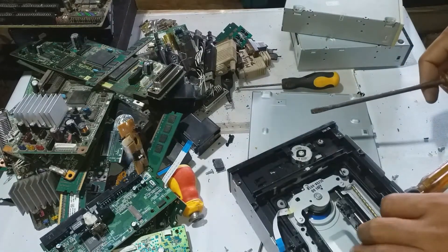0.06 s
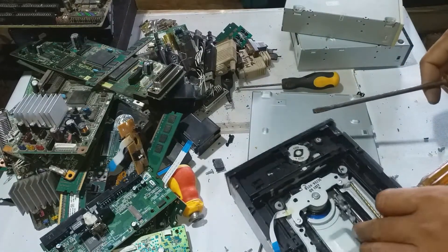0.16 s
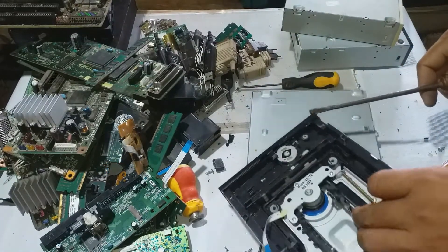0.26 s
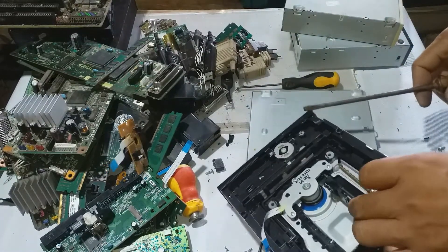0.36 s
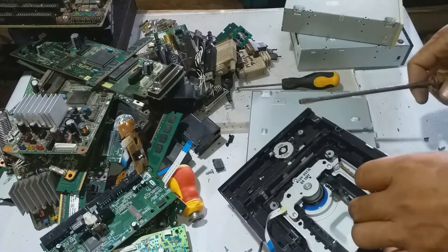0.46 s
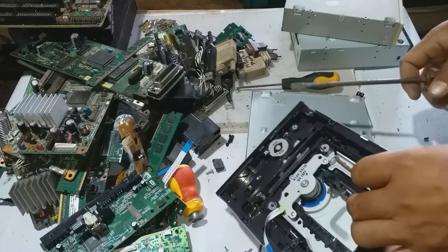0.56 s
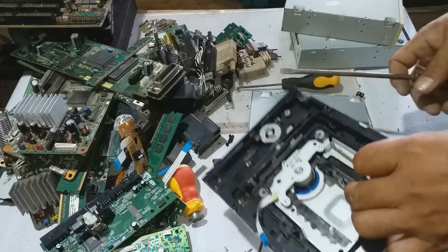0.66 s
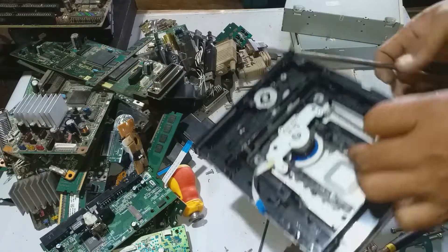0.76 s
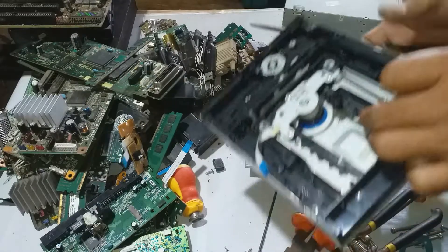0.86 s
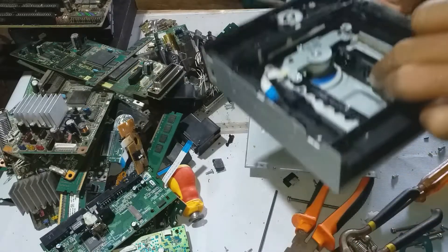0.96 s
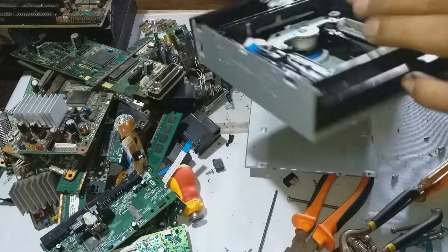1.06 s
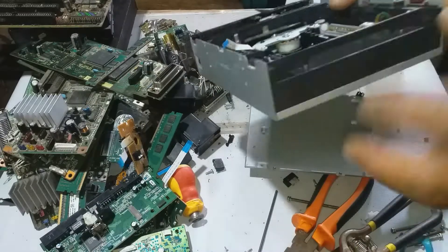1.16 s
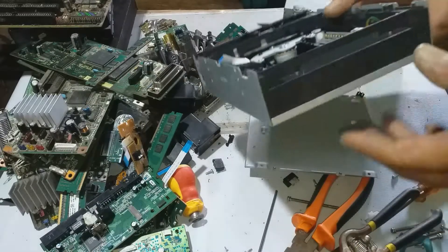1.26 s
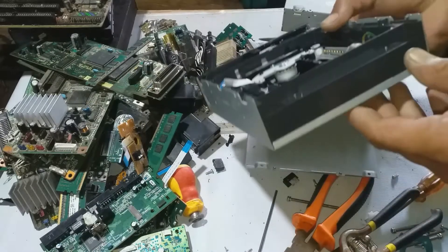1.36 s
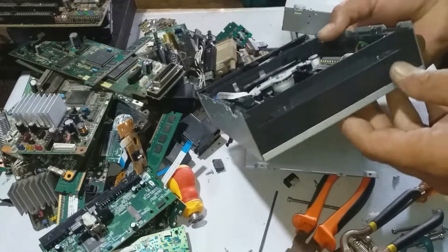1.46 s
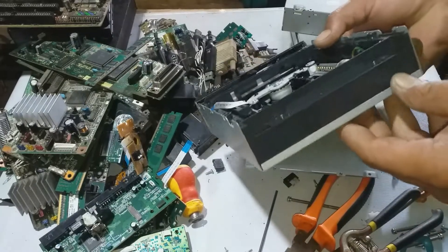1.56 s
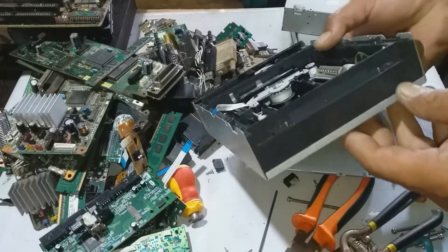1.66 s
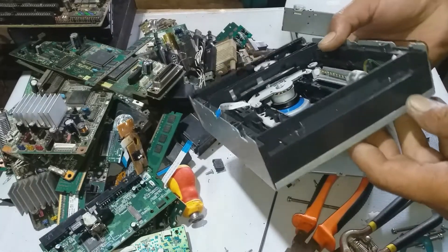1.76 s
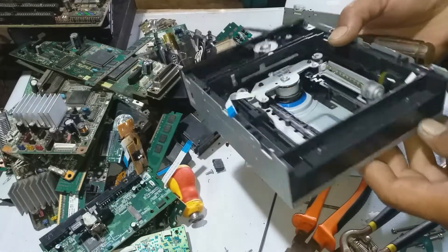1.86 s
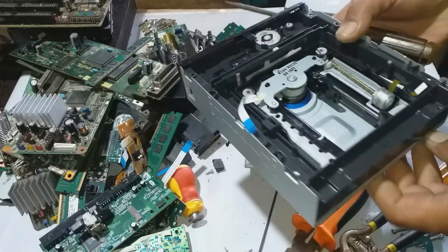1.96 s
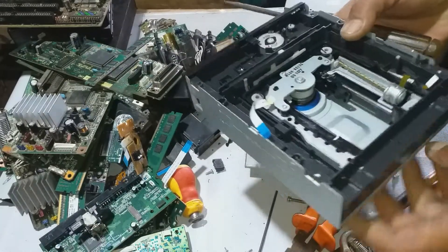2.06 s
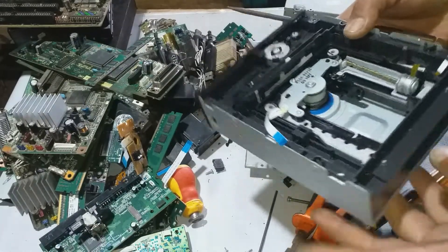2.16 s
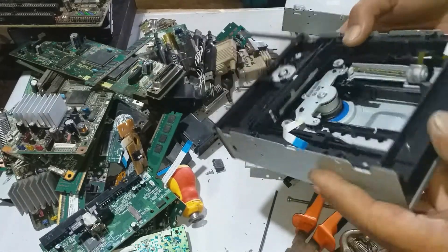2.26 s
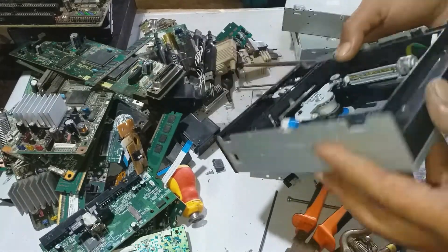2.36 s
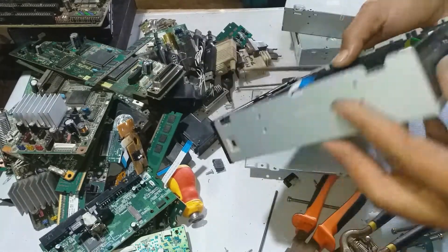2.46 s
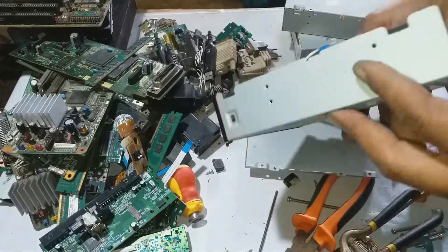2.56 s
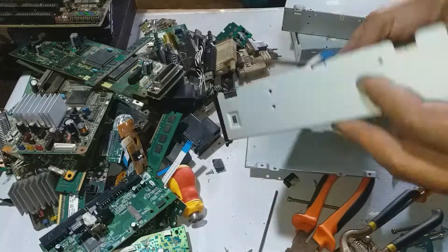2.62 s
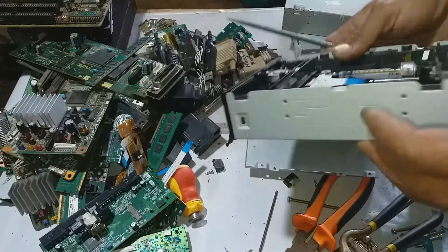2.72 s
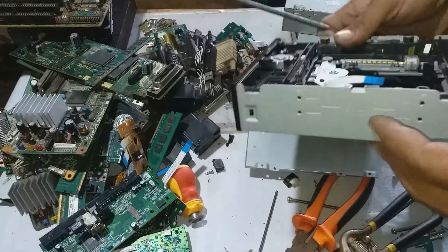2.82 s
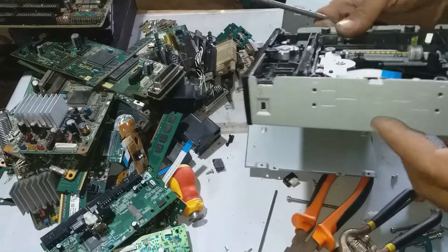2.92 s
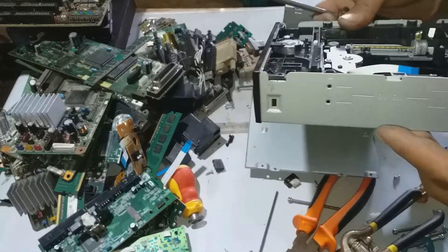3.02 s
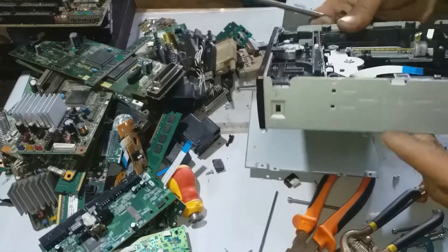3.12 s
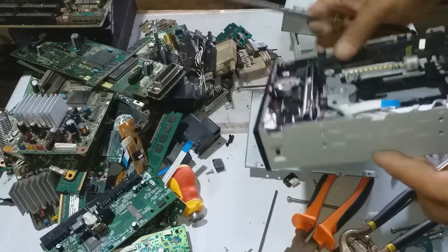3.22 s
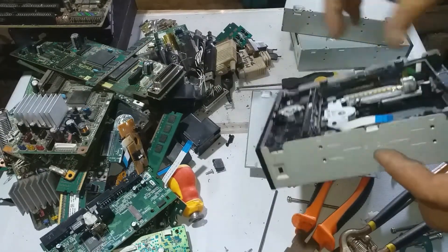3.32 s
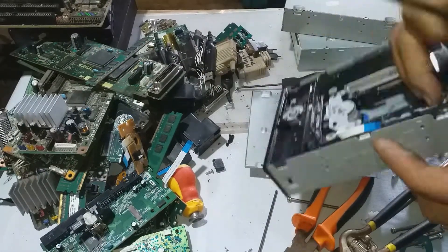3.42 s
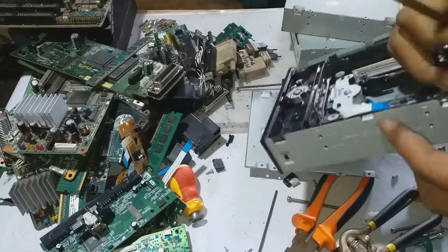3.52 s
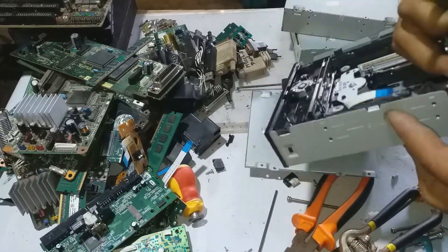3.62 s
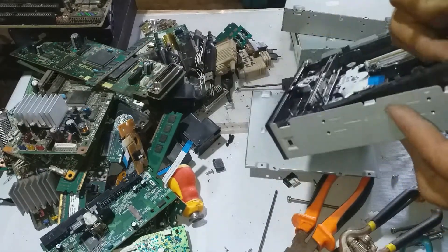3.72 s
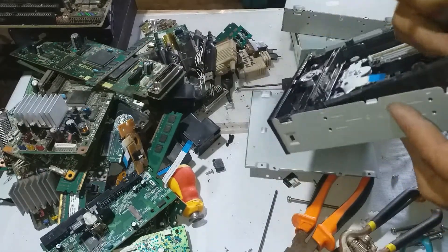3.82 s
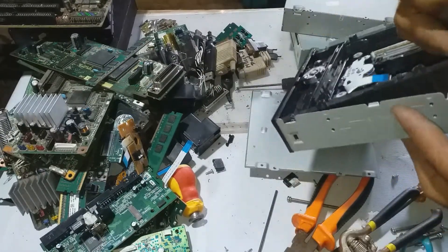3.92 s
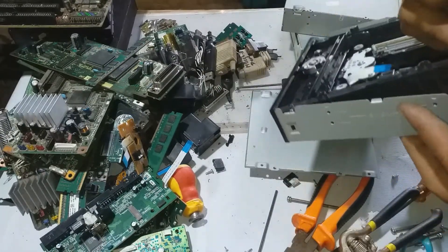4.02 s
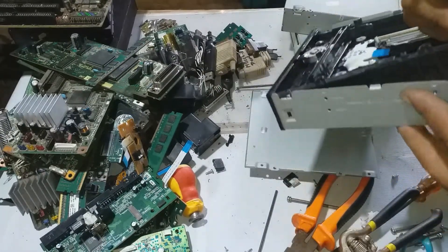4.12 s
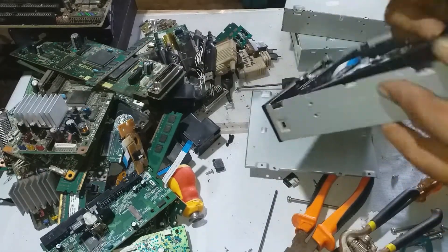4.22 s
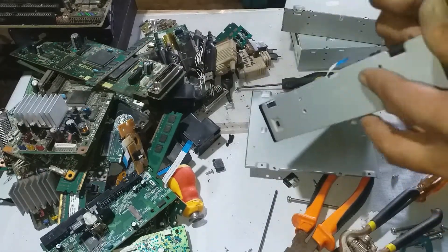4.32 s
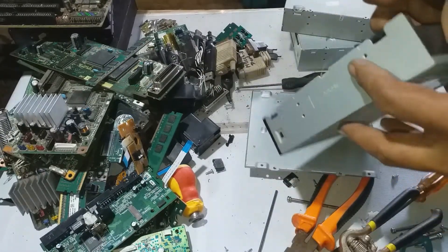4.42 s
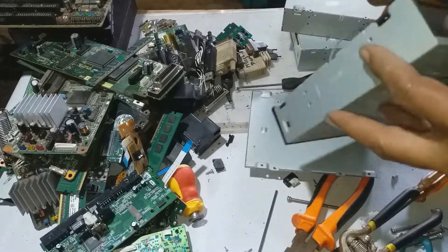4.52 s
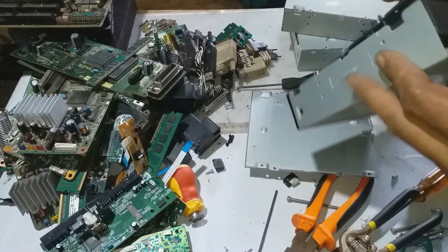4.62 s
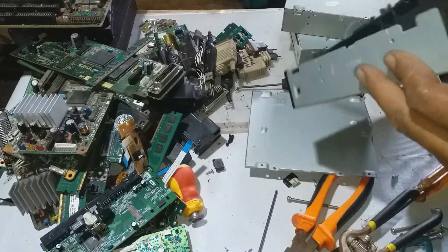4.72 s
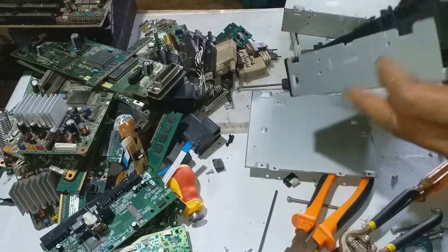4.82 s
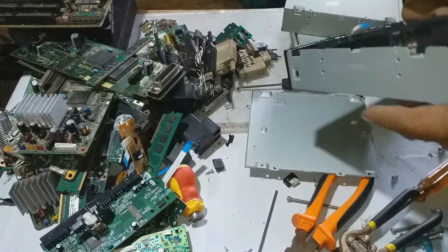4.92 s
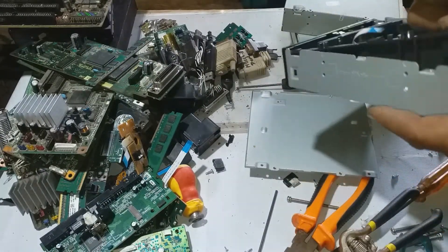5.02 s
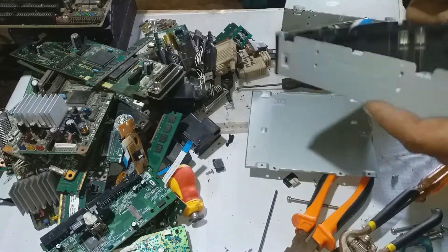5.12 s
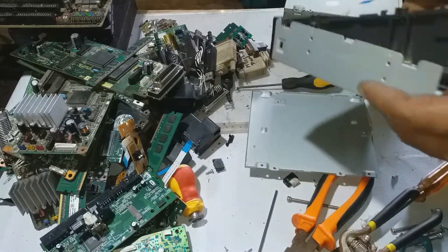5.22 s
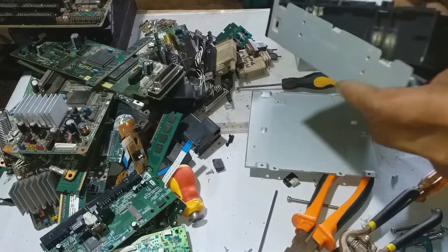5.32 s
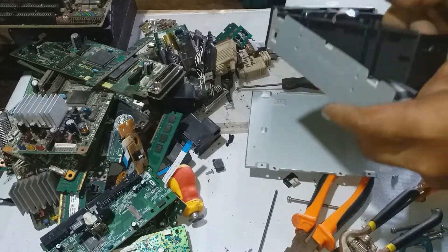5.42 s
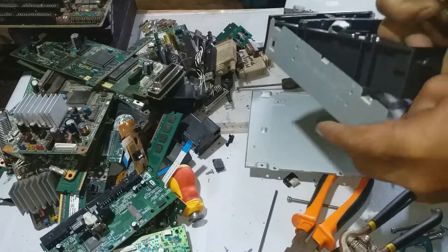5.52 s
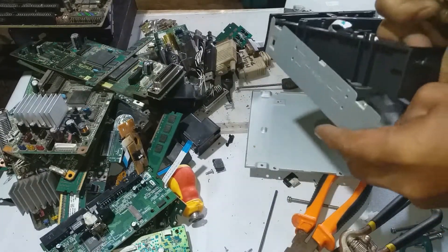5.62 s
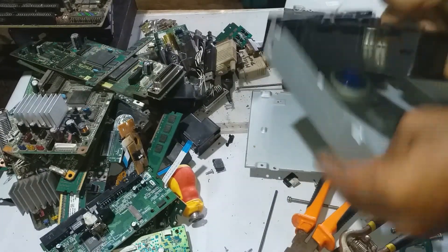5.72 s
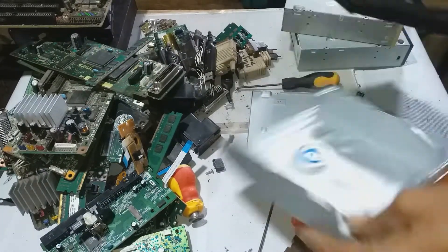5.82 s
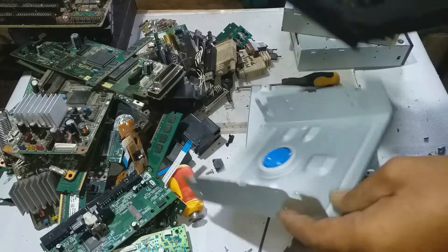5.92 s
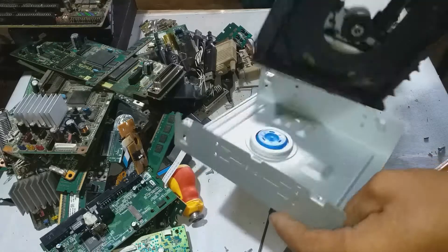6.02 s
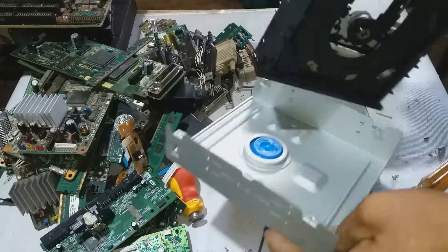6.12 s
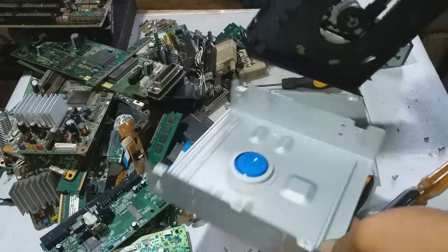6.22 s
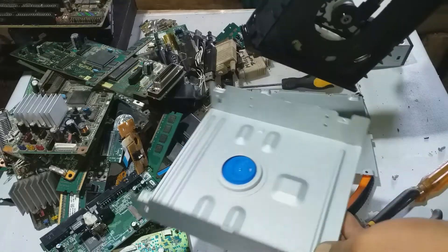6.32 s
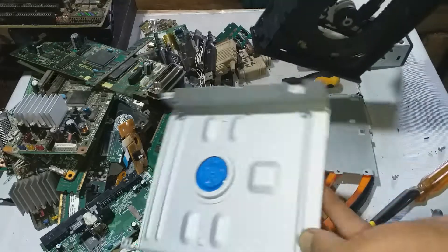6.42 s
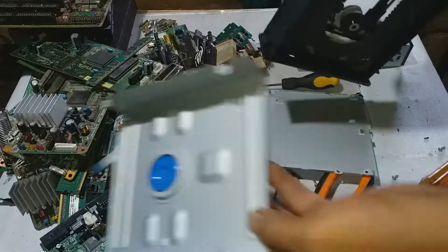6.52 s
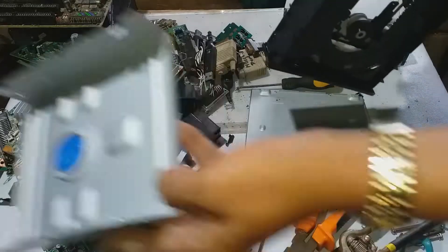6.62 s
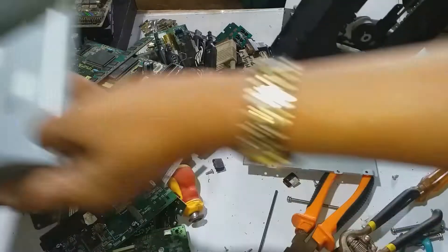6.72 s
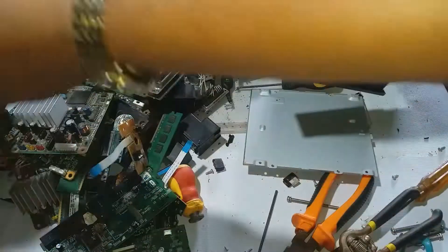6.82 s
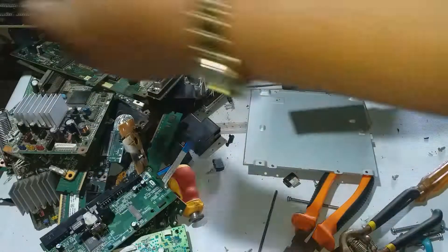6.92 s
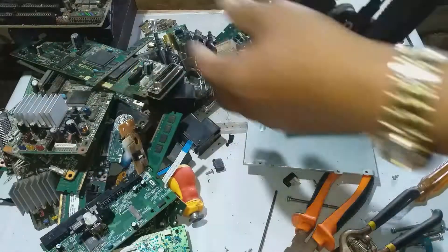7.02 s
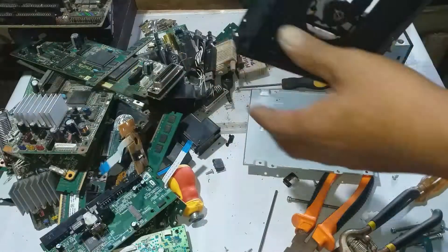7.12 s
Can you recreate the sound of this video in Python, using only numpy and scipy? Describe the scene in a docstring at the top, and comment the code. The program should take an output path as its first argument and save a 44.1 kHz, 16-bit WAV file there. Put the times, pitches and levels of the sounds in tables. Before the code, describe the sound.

Hands and a screwdriver work on a plastic and steel case in a small room with very short reflections. Light knocks and soft scuffs lead to harder raps and crackling catches, then a rattling burst of ringing sheet metal and a gritty edge scrape. It falls quiet, and the thrown metal lands sharply at the end. Low rumble and thin hiss lie faintly underneath, with a close microphone.

```python
"""An optical drive is taken apart by hand over a workbench in a small, dry room.
A screwdriver taps and prises: each knock or snap is a noise burst with one damped mode. Sliding parts rub by
stick-slip friction. The sheet-steel cover tears loose with a clatter, rings as a sum of decaying modes until
the hand damps it, and is thrown onto a heap of scrap. Low rumble and thin hiss are filtered noise; a very
short burst of steady tones is a sum of sines."""
import sys
import numpy as np
from scipy import signal
from scipy.fft import rfft, irfft
from scipy.io import wavfile
from scipy.ndimage import uniform_filter1d, map_coordinates

SR = 44100
rng = np.random.default_rng(int(sys.argv[2]) if len(sys.argv) > 2 else 0)


def log_audio(samples):
    """Write samples as a 16-bit WAV file to the path given in sys.argv[1]."""
    # one column per channel
    frames = np.atleast_2d(samples).T
    # limit to full scale, then quantise
    limited = np.clip(frames, -1, 1)
    pcm = np.round(limited * 32767).astype(np.int16)
    wavfile.write(sys.argv[1], SR, pcm)


N = 316197
TOP_HZ = 16050  # upper band limit of the microphone and of the cover's modes

# modes of the free steel cover, levels relative: mode_hz, level_db, t60_s
STEEL = [(270, -4.5, 0.32), (380, -6, .25), (468, -7.5, .4), (803, -8.5, 1.4), (939, -7.5, 0.67),
         (1386, -9, 1.1), (1470, -3, 1), (1690, -1.5, 1.7), (2270, 0, .25), (2476, -3, 1.8), (2710, -3, 3),
         (3057, 1.5, 1.4), (3912, 1.5, 1.7), (4300, -5, 1), (4300, -4.5, 1.1), (4940, 1.5, 0.47),
         (5500, -6, 1.5), (5927, -11, 1.3), (6202, -8, 1.1), (6450, -9, 1.7), (6907, -11, 1.2),
         (7951, -12.5, 1.3), (8700, -4.5, 1), (9399, -5.5, 1.1)]
# resonances that a rubbing finger or tool brings out: centre_hz, width_hz, lift_db
RUBBED = [(1160, 37, 7.5), (1960, 260, 6.5), (2930, 150, 3.5), (4150, 300, 4), (6150, 200, 5),
          (8100, 310, 2)]
# the cover's edge drags along the chassis as it comes off: time_s, level_db
COVER_DRAG = [(5.78, -100), (5.82, -45), (5.955, -33.5), (6.09, -40), (6.17, -41), (6.29, -71), (6.4, -100)]
# dull knocks of tool and plastic chassis, levels before the mix: start_s, level_db, bass_db, bright_db, mode_hz
KNOCKS = [(0.089, -45.5, 4, -7.5, 1080), (0.1859, -35.5, 9, -6, 445), (0.2097, -35, -15, 0, 2450),
          (0.2305, -38, -5, -6, 1133), (0.2615, -28, 8.5, -1, 3030), (0.266, -29, 2, -13, 2536),
          (0.2795, -34, -9, -14, 1730), (0.3237, -42, -1.5, -23, 1740), (0.334, -43, 12, -11.5, 1270),
          (0.535, -43.5, -5, -7.5, 1350), (0.9079, -53, 17, 1, 3040), (0.9615, -43.5, -5, -7, 2850),
          (1.0018, -26.5, -4.5, -10, 969), (1.028, -49, -11, 0, 3680), (1.0627, -49.5, -9, 4, 3680),
          (1.9445, -55.5, 7, -4, 1970), (1.9817, -52.5, 2, -4, 3580), (2.2327, -46.5, 9.5, -10, 597),
          (2.4482, -27, -37, -13, 2030), (2.454, -36.5, -7.5, -9, 1830), (2.5268, -44.5, 0, -15, 1960),
          (2.893, -46.5, -25, 5, 2980), (3.1608, -42, -6, -7, 1100), (3.2276, -43.5, -4, -8.5, 2320),
          (3.441, -37, -11, -2.5, 2510), (3.4924, -28.5, -10.5, -13.5, 2200),
          (3.5377, -35.5, -4, -15, 1240), (3.5716, -35, -6, 0.5, 2507), (3.6451, -21.5, -12, -1.5, 1496),
          (3.6553, -32, 4.5, -12, 922), (3.6702, -20, -17, 2.5, 2153), (3.9598, -28.5, -8.5, -14, 1144),
          (4.3023, -13.5, -9.5, -1.5, 1135), (4.54, -39, -4, 0, 1142), (4.5626, -41, -9, -24, 1285),
          (4.8751, -40, -3, -19, 2630), (5.1461, -34, 1, -2.5, 1110), (5.1685, -39, 2, -14.5, 990),
          (5.1849, -40.5, 0, -7.5, 910), (5.5686, -26.5, -10.5, 2, 1142), (7.0391, -54, 0.5, -3.5, 970)]
# plastic catches snap past the steel edge, levels before the mix: start_s, level_db, bright_db
SNAPS = [(2.78, -51, 17), (3.0118, -56, 2), (3.2822, -56, 18), (3.763, -25, 6.5), (3.8625, -28.5, -0.5),
         (3.9271, -30.5, 1.5), (3.9424, -32, 5.5), (3.9736, -24, 3), (4.064, -25.5, 7.5), (4.0718, -24, 10),
         (4.0957, -30.5, -3), (4.1678, -33, -0.5), (4.235, -26, 15), (4.2419, -30, 10), (4.2751, -22, 8),
         (4.6264, -43, -3), (4.6423, -28.5, 11.5), (4.837, -29.5, 5), (4.904, -49.5, 1), (5.0073, -24, 11),
         (5.03, -30.5, 9), (5.0797, -21.5, 9), (5.1031, -11, 5.5), (5.1141, -15.5, 4.5), (5.2794, -38, 1.5),
         (5.3019, -29, 8), (5.326, -35, 4.5), (5.3465, -37, -0.5), (5.4623, -28, 12.5), (5.474, -14.5, 7),
         (5.5035, -13.5, 6.5), (5.5092, -28, 9), (5.5425, -39, 1), (5.5955, -33, 13), (5.6758, -36.5, 4),
         (5.6953, -39, 10), (6.0173, -26.5, 3.5), (6.2362, -47, 11), (6.289, -55.5, 10.5),
         (6.3335, -52.5, 19.5), (6.4645, -53, 4), (7.1035, -42.5, 10)]


def amp(db):
    """Level to amplitude: 20 dB is a factor of ten."""
    return 10 ** (np.asarray(db) / 20)


def unit(x):
    """Normalisation by mean power: x at rms 1."""
    return x / np.sqrt(np.mean(x ** 2) + 1e-20)


def punch(sound):
    """Normalisation by onset power: a hit at rms 1 over its first 8 ms."""
    return sound / np.sqrt(np.mean(sound[:SR // 125] ** 2))


def along(points, hz):
    """Interpolation of (Hz, value) points on a logarithmic frequency axis."""
    f, v = np.transpose(points)
    return np.interp(np.log(hz + 1), np.log(f + 1), v)


def level(rows):
    """Envelope linear in decibels: (s, dB) rows as a gain for every sample."""
    return amp(np.interp(np.arange(N) / SR, *np.transpose(rows)))


def fade(t, t60):
    """Exponential decay that loses 60 dB in t60 seconds."""
    return np.exp(-np.log(1000) * t / t60)


def swell(start, length, attack, release):
    """Exponential rise, hold and exponential fall; attack and release are the times for 60 dB."""
    t = np.arange(N) / SR
    return fade(np.maximum(start - t, 0), attack) * fade(np.maximum(t - start - length, 0), release)


def wobble(rate):
    """Band-limited random modulation: a smooth curve through rate random knots a second."""
    knots = rng.standard_normal(int(N * rate / SR) + 4)
    return map_coordinates(knots, [np.arange(N) * rate / SR])


def colour(x, db_of_hz, size=4096):
    """Minimum-phase filtering: a folded cepstrum makes the given dB response causal."""
    log_gain = np.log(amp(db_of_hz(np.fft.rfftfreq(size, 1 / SR))) + 1e-6)
    cepstrum = irfft(log_gain)
    cepstrum[1:size // 2] *= 2
    cepstrum[size // 2 + 1:] = 0
    impulse_response = irfft(np.exp(rfft(cepstrum)))
    return signal.fftconvolve(x, impulse_response)[:len(x)]


def low_cut(x, hz):
    """Second-order high-pass: x without the bass below hz."""
    return signal.sosfilt(signal.butter(2, hz, "high", fs=SR, output="sos"), x)


def band_pass(x, low_hz, high_hz):
    """Band-pass filtering: the part of x between two frequencies."""
    return signal.sosfilt(signal.butter(2, [low_hz, high_hz], "band", fs=SR, output="sos"), x)


def lift_db(resonances, hz):
    """Resonance curves: the summed lift, in dB, at each frequency."""
    return sum(db / (1 + (2 * (hz - centre) / width) ** 2) for centre, width, db in resonances)


def add(track, s, sound):
    """Superposition: mix a sound into the track at time s."""
    start = max(0, round(s * SR))
    part = track[start:start + len(sound)]
    part += sound[:len(part)]


def ringing(modes):
    """Modal response of a struck body: decaying sines from (Hz, dB rms, t60 s) rows."""
    t = np.arange(SR) / SR
    return sum(np.sqrt(2) * amp(db) * np.sin(2 * np.pi * hz * t) * fade(t, t60) * rng.choice([-1, 1])
               for hz, db, t60 in modes)


def contact(bass_db, bright_db, mode_hz, crack_t60, body_t60, body_db, mode_db, mode_t60, edge_db=3):
    """Impact: a sharp crack, the dense damped ring of the parts, and the mode that this spot favours."""
    # spectrum of a contact: frequency_hz, density_db (dB per Hz)
    contact_spectrum = [(30, -27.5), (100, -15), (220, -3), (450, -1.5), (800, 0.5), (1400, -0.5),
                        (3000, 2), (7000, -0.5), (9800, -6.5), (11200, -16.5), (15500, -14.5)]
    # resonances of the chassis in its case: centre_hz, width_hz, lift_db
    chassis = [(450, 80, 4), (620, 100, 3), (950, 110, 3), (1140, 130, 4), (1780, 200, 3), (2480, 220, 3),
               (3500, 500, 2), (4860, 250, 3), (6600, 600, 3), (8900, 500, 3)]
    t = np.arange(SR // 4) / SR
    attack = 1 - np.exp(-t / .00015)
    # the very top dies first, so the crack is brighter than the ring
    crack = attack * fade(t, crack_t60) * rng.standard_normal(len(t))
    crack = colour(crack, lambda hz: along([(3000, 0), (12000, edge_db)], hz), size=256)
    body = amp(body_db) * attack * fade(t, body_t60) * rng.standard_normal(len(t))
    # heavy contacts push the whole case, hard edges add treble
    tilt = [(400, bass_db), (1000, 0.0024), (2800, 0.0079), (6200, bright_db)]
    burst = colour(crack + body,
                   lambda hz: along(contact_spectrum, hz) + along(tilt, hz) + lift_db(chassis, hz))
    # higher modes die sooner; mode_t60 holds at 2000 Hz
    mode_fade = fade(t, mode_t60 * (mode_hz / 2000) ** -.3)
    mode = attack * np.sin(2 * np.pi * mode_hz * t) * mode_fade
    return punch(punch(burst) + amp(mode_db) * punch(mode))


def dragged(modes, drag, damping, judder_db, grit_db):
    """Stick-slip excitation: random slips keep feeding a sheet's modes, so each swells and fades by chance."""
    slips = (rng.random(N) < 1200 / SR) * rng.standard_normal(N)  # 1200 a second on average
    force = (unit(slips) + rng.standard_normal(N) / 2) * amp(judder_db * wobble(80))
    body = ringing([(hz, db, t60 / damping) for hz, db, t60 in modes])
    # each slip also gives a short scratch before the modes build up
    onset = body[:SR // 300] * np.linspace(1, 0, SR // 300)
    scratch = unit(signal.fftconvolve(force, onset)[:N])
    modal = unit(signal.fftconvolve(force, body)[:N])
    loudness = level(drag) * (level(drag) > amp(-90))  # silent below -90 dB
    return loudness * unit(modal + amp(grit_db) * scratch)


def background(rumble_db=4, hiss_db=1.5):
    """Filtered noise: low rumble and thin two-band hiss, which sink until just after the clatter, then recover."""
    # background level before the two trims above: time_s, level_db
    floor = [(3.5, -66.5), (6.1, -75), (6.4, -83), (6.7, -82), (7.05, -70.5)]
    # spectra of the two parts: frequency_hz, density_db (dB per Hz, relative)
    rumble_spectrum = [(20, -36), (40, -21), (70, 3), (140, 4), (220, -5.5), (400, -14.5), (850, -15.5),
                       (1400, -31), (3000, -32), (8000, -18), (16000, -37)]
    hiss_spectrum = [(3000, -33.5), (8000, -22), (9200, -11.5), (9900, 4.5), (10700, -19.5), (11800, -29.5),
                     (12700, -14.5), (13600, 4.5), (14600, -20), (16000, -27.5)]
    rumble = unit(colour(rng.standard_normal(N), lambda hz: along(rumble_spectrum, hz)))
    rumble = rumble * amp(1.5 * wobble(6))
    hiss = unit(colour(rng.standard_normal(N), lambda hz: along(hiss_spectrum, hz)))
    return level(floor) * (amp(rumble_db) * rumble + amp(hiss_db) * hiss)


def rubbing_effort():
    """Addition of powers: the grip until the cover is off, the strokes, and a short slip around each contact."""
    # fingers and parts slide on the case, levels before the friction gain: start_s, length_s, level_db
    stroke_rows = [(0.075, 0.32, -59), (0.909, .13, -53.5), (1.336, 0.26, -74), (1.935, 0.11, -63.5),
                   (2.263, 0.67, -59), (2.952, 0.32, -64), (3.47, .13, -51), (4.284, 0.022, -33.5),
                   (4.521, 0.042, -48.5), (4.661, 0.046, -47), (5.714, 0.073, -25.5), (5.875, 0.23, -41),
                   (6.333, 0.11, -74), (6.912, 0.095, -66), (7.155, 0.048, -23)]
    attack_s, release_s = .06, 0.096  # time to rise and to fall by 60 dB
    slip_attack_s, slip_release_s = .03, 0.21
    grip_db, slip_db = -75, -23.5  # the hand's constant light rub; a slip relative to its contact
    grip = amp(grip_db) * swell(0, COVER_DRAG[-1][0], attack_s, release_s)
    strokes = sum((amp(db) * swell(s, length, attack_s, release_s)) ** 2 for s, length, db in stroke_rows)
    slips, t = np.zeros(N), np.arange(-SR // 10, SR // 4) / SR
    slip = fade(np.maximum(-t, 0), slip_attack_s) * fade(np.maximum(t, 0), slip_release_s)
    for s, db, *tone in KNOCKS + SNAPS:
        add(slips, s + t[0], (amp(db + slip_db) * slip) ** 2)
    return np.sqrt(grip ** 2 + strokes + slips)


def sliding(slips_per_s=2500, smooth_db=0, uneven_db=3.0, patchy_db=4.0, gain_db=-1):
    """Friction: many tiny slips excite the case, while random spectral patches shift as the grip moves."""
    # spectrum of rubbing: frequency_hz, density_db (dB per Hz, relative)
    rub_spectrum = [(60, -32), (300, -4), (1000, -0.5), (2200, 2.5), (4500, 0.5), (8500, -3), (11000, -11),
                    (16000, -15.5)]
    grains = (rng.random(N) < slips_per_s / SR) * rng.standard_normal(N)
    force = unit(grains) + amp(smooth_db) * rng.standard_normal(N)
    force = force * amp(uneven_db * wobble(110))
    z = signal.stft(force, nperseg=512)[2]
    # random gains smoothed over neighbouring bands, then over time
    patches = uniform_filter1d(rng.standard_normal(z.shape), size=3, axis=0)
    patches = uniform_filter1d(patches, size=14, axis=1)
    force = signal.istft(z * amp(patchy_db * unit(patches)), nperseg=512)[1][:N]
    rub = unit(colour(force, lambda hz: along(rub_spectrum, hz) + lift_db(RUBBED, hz)))
    return amp(gain_db) * rubbing_effort() * rub


def ticks(bass_db=-6, bright_db=2, crack_t60=.015, body_t60=0.054, body_db=-8, mode_db=-6, mode_t60=.04):
    """Random micro-impacts: small edges catch, as strongly as the rubbing is at that moment."""
    ticks_per_s, tick_db, spread_db = 14, -2, 5  # level relative to the rubbing effort, and its scatter
    track, effort = np.zeros(N), rubbing_effort()
    for place, spot, force in rng.random((round(ticks_per_s * N / SR), 3)):
        at = int(place * N)
        hz = RUBBED[int(spot * len(RUBBED))][0]
        tick = contact(bass_db, bright_db, hz, crack_t60, body_t60, body_db, mode_db, mode_t60)
        add(track, at / SR, effort[at] * amp(tick_db + spread_db * (2 * force - 1)) * tick)
    return track


def scuffs(spread=0.11):
    """Narrow-band friction noise: short soft scuffs of fingertips on the steel sheet."""
    # middle_s, half_width_s, pitch_hz, level_db
    scuff_rows = [(0.11, 0.038, 1160, -51), (1.185, 0.027, 3870, -57), (1.986, 0.0078, 3780, -53),
                  (2.041, 0.017, 3760, -68), (2.773, 0.066, 2900, -61.5), (4.71, 0.021, 3980, -57)]
    t, track = np.arange(N) / SR, np.zeros(N)
    for s, half_width, hz, db in scuff_rows:
        scuff = unit(band_pass(rng.standard_normal(N), hz / (1 + spread), hz * (1 + spread)))
        track += amp(db) * np.exp(-((t - s) / half_width) ** 2 * 2) * scuff
    return track


def knock(bass_db, bright_db, hz, crack_t60=.02, body_t60=.074, body_db=-6.0, mode_db=-8.0, mode_t60=0.06,
          edge_db=2):
    """Blunt impact: the whole chassis answers."""
    return contact(bass_db, bright_db, hz, crack_t60, body_t60, body_db, mode_db, mode_t60, edge_db)


def snap(bass_db, bright_db, hz, crack_t60=0.025, body_t60=.072, body_db=-8.0, mode_db=-10, mode_t60=0.057,
         edge_db=3):
    """Sudden release of a bent catch: mostly crack, little ring."""
    return contact(bass_db, bright_db, hz, crack_t60, body_t60, body_db, mode_db, mode_t60, edge_db)


def clicks():
    """Impact and rebound: each knocked or snapped part touches once more, a little later and weaker."""
    catch_hz, catch_spread, catch_bass_db = 6200, 0.17, -18.5  # a catch's mode, its log scatter, lack of weight
    rebound_s, rebound_loss_db = .004, 13.5
    track = np.zeros(N)
    hits = [(knock, *row) for row in KNOCKS]
    for s, db, bright_db in SNAPS:
        hz = catch_hz * np.exp(catch_spread * rng.normal())
        hits.append((snap, s, db, catch_bass_db, bright_db, hz))
    for sound, s, db, *tone in hits:
        add(track, s, amp(db) * sound(*tone))
        again_s = s + rebound_s * rng.uniform(.5, 2)
        add(track, again_s, amp(db - rebound_loss_db) * sound(*tone))
    return track


def plate_drag():
    """Friction-driven plate modes: the drive drags across a steel plate on the bench as it is lifted."""
    # modes of the plate before the damping below: mode_hz, level_db, t60_s
    plate = [(258, -3.5, 0.25), (352, -2.5, 0.12), (624, -9, 0.13), (963.6, -0.5, .12), (1200, -15, 0.13),
             (1425, 3, 0.21), (1550, 3, 0.089), (1900, -5, .08), (2070, -8.5, .1), (2940, -2, .25),
             (3900, -3.5, .06), (5280, -6, 0.079)]
    # loudness of the drag: time_s, level_db
    drag = [(.528, -100), (0.535, -43), (.6, -46.5), (.68, -54), (.76, -63), (.85, -100)]
    return dragged(plate, drag, damping=1.8, judder_db=2.0, grit_db=-2)


def turning(low_hz=58, high_hz=115, attack=.3, release=.5):
    """Low band of noise: a soft rumble as the hands turn the drive over."""
    # start_s, length_s, level_db
    turns = [(2.49, 0.19, -60.5), (2.748, 1.4, -70)]
    loudness = np.max([amp(db) * swell(s, length, attack, release) for s, length, db in turns], axis=0)
    return loudness * unit(band_pass(rng.standard_normal(N), low_hz, high_hz))


def frozen_tones(waver=0.21):
    """Inharmonic partials, phases wavering slightly at random: a brief steady burst just before a loud knock."""
    # partials before the envelope: partial_hz, level_db (rms)
    partials = [(1157, -33), (1906, -32), (2729, -33.5), (3219, -32.5), (3752, -29), (4400, -35),
                (9308, -31)]
    # envelope of the whole burst: time_s, level_db
    burst_envelope = [(4.245, -64.5), (4.255, -2.5), (4.277, 0.5), (4.283, -17.5), (4.32, -73)]
    t = np.arange(N) / SR
    tones = sum(np.sqrt(2) * amp(db) * np.sin(2 * np.pi * hz * t + waver * wobble(150))
                for hz, db in partials)
    return level(burst_envelope) * tones


def blows(crack_t60=0.02, body_t60=0.12, body_db=-3.0, mode_db=-11, mode_t60=.13, edge_db=6):
    """Hard impacts on the loose cover, each on a spot that favours one mode."""
    # levels before the mix: start_s, level_db, bass_db, bright_db, mode_hz
    blow_rows = [(5.7071, -11, 6.5, 4, 5360), (5.7151, -14, 8, 13, 4380), (5.7293, -14, 15, 16.5, 7400),
                 (5.7448, -10, 2, 5.5, 3375), (5.7537, -18, -1, 8, 4830), (5.7695, -9.5, -25, 8.5, 4900),
                 (5.781, -11.5, 1.5, 7.5, 2300), (5.8009, -28, -5.5, 9, 3865),
                 (5.8645, -18.5, -5.5, -0.5, 1672), (7.1259, -16.5, -18.5, 1, 4250),
                 (7.1327, -8, -41, 4.5, 3750), (7.1457, -14, -10, 10, 4220), (7.1559, -16, -20, 4, 5070),
                 (7.1652, -18.5, -15, -17, 2400)]
    track = np.zeros(N)
    for s, db, *tone in blow_rows:
        add(track, s, amp(db) * contact(*tone, crack_t60, body_t60, body_db, mode_db, mode_t60, edge_db))
    return track


def jolts(t60=0.042, low_hz=60, high_hz=200):
    """Damped low-frequency shock: dull thumps as the chassis jumps past the cover's catches."""
    # start_s, level_db
    jolt_rows = [(5.713, -25.5), (5.746, -28.5), (5.780, -29.5), (5.865, -50.5)]
    track, t = np.zeros(N), np.arange(SR // 5) / SR
    for s, db in jolt_rows:
        thump = band_pass(rng.standard_normal(len(t)) * fade(t, t60), low_hz, high_hz)
        add(track, s, amp(db) * thump / np.std(thump[:SR // 50]))  # level over the first 20 ms
    return track


def cover(dense_db=-2, dense_t60=0.98, hand_t60=0.078, count=160):
    """Modal superposition: the sheet rings in a few strong modes over many weak ones, until it is gripped."""
    # start_s, level_db, bright_db, damped_s (the grip; before the start means held throughout)
    rings = [(5.713, -37, 2, 6.17), (5.781, -30, 18, 5.4), (5.864, -33.5, 10.5, 6.16),
             (6.464, -63.5, -2.5, 6.52), (7.133, -17, 11.5, 7.1)]
    # spectrum of the weak modes: frequency_hz, level_db (relative)
    sheet = [(600, -6.5), (1150, -15), (1600, 1), (2200, -10.5), (2900, 2), (7000, -4), (10000, -4.5),
             (11500, -8), (16000, -7)]
    track, t = np.zeros(N), np.arange(SR * 3 // 4) / SR
    hz, db, t60 = np.transpose(STEEL)
    weak_hz = 650 + (TOP_HZ - 650) * ((np.arange(count) + rng.random(count)) / count) ** 1.5
    strong = amp(db)
    weak = amp(along(sheet, weak_hz) + 2.8 * rng.standard_normal(count))
    gain = np.r_[strong / np.linalg.norm(strong), amp(dense_db) * weak / np.linalg.norm(weak)]
    hz, t60 = np.r_[hz, weak_hz], np.r_[t60, dense_t60 * (weak_hz / 3000) ** -.2]
    modes = np.sin(np.outer(2 * np.pi * hz, t).astype(np.float32))
    modes = modes * fade(t, t60[:, None]).astype(np.float32)
    for s, ring_db, bright_db, damped in rings:
        # each blow lands elsewhere on the sheet and shares its energy differently
        share_db = along([(1600, 0.0038), (5000, bright_db)], hz) + rng.normal(0, 2, len(hz))
        share = gain * amp(share_db) * rng.choice([-1, 1], len(hz))
        share = (share / np.linalg.norm(share) * np.sqrt(2)).astype(np.float32)
        grip = fade(np.maximum(s + t - damped, 0), hand_t60)
        add(track, s, amp(ring_db) * grip * (share @ modes))
    return track


def edge_drag():
    """Friction-driven sheet modes, damped by contact: the cover's edge drags along the chassis."""
    return dragged(STEEL, COVER_DRAG, damping=3.6, judder_db=3.5, grit_db=-2.5)


def burrs(per_s=900, low_hz=8500, judder_db=5, gain_db=-7):
    """Random impulses: burrs on the dragged steel edge catch in a spray of tiny bright clicks."""
    grains = (rng.random(N) < per_s / SR) * rng.standard_normal(N)
    spray = unit(low_cut(grains, low_hz)) * amp(judder_db * wobble(70))
    return amp(gain_db) * level(COVER_DRAG) * spray


def held_case(parts):
    """Sympathetic resonance: the handling sounds faintly excite the modes of the case while it is held."""
    # levels before the coupling gain: mode_hz, level_db, t60_s
    held = [(1130, -18, .4), (1960, -4, .15), (2280, -5, .6), (2930, 0, .12), (8130, 0, .12)]
    return amp(-72) * signal.fftconvolve(parts, ringing(held))[:N]


def room(x, delay_s=.004):
    """Reverberation as decaying noise: the short answer of the bench and the near walls."""
    # frequency_hz, t60_s
    room_decay = [(150, 0.087), (500, 0.17), (1400, 0.083), (4000, 0.075), (9000, 0.086), (16000, 0.088)]
    hz, t, z = signal.stft(rng.standard_normal(SR // 3), SR, nperseg=256)
    tail = signal.istft(z * fade(t, along(room_decay, hz)[:, None]), SR, nperseg=256)[1]
    tail = np.pad(tail / np.linalg.norm(tail), (round(delay_s * SR), 0))
    return signal.fftconvolve(x, tail)[:N]


def scene():
    """Superposition of all handling sounds, their room reflections, the tone burst and the background."""
    steady = background() + turning()
    drags = low_cut(plate_drag() + edge_drag(), 191.1)  # thin sheet radiates little bass
    steel = cover() + drags + jolts()
    rubs = sliding() + ticks() + scuffs() + burrs()
    parts = rubs + frozen_tones() + amp(-0.53) * clicks() + amp(-1) * blows()
    return (parts + held_case(parts) + amp(-11) * room(parts) + steel + steady)[None]


def record(dry):
    """Band limiting and soft saturation: the microphone thins the bass, rounds peaks and cuts the top."""
    heard = low_cut(dry, 43)
    rounded = heard / (1 + np.abs(heard / .9) ** 6) ** (1 / 6)  # peaks approach 0.9
    low_pass = signal.firwin(201, TOP_HZ, fs=SR, window=("kaiser", 8))
    return signal.fftconvolve(rounded, low_pass[None], mode="same", axes=1)


dry = scene()
out = record(dry)
log_audio(out)
```